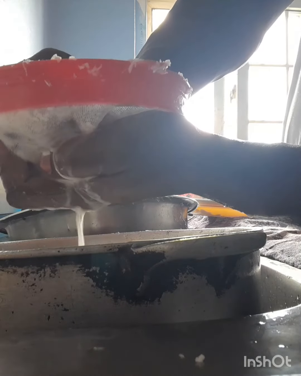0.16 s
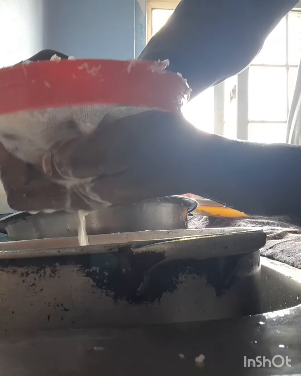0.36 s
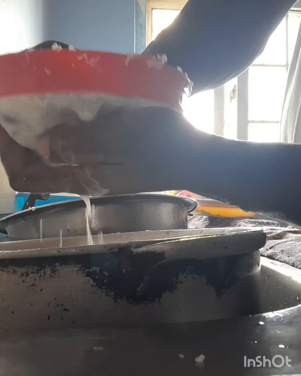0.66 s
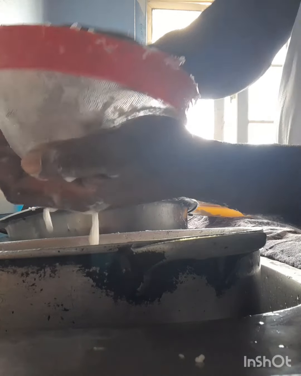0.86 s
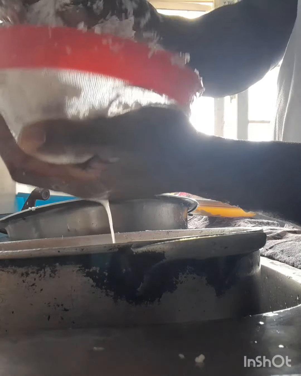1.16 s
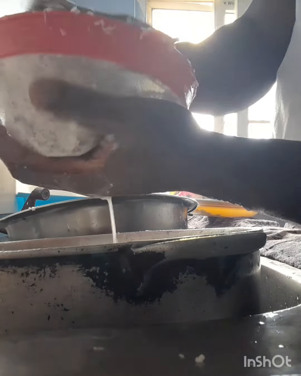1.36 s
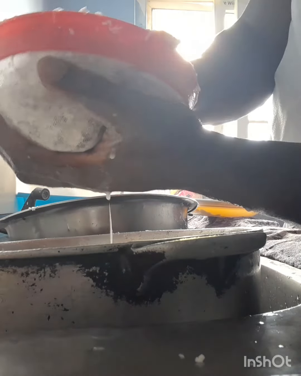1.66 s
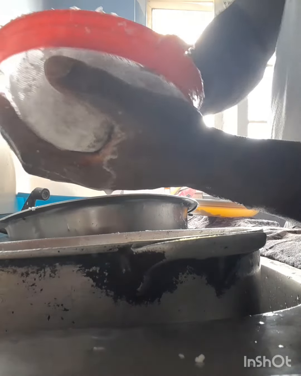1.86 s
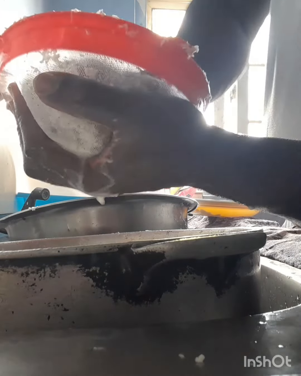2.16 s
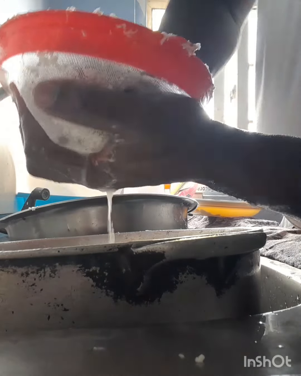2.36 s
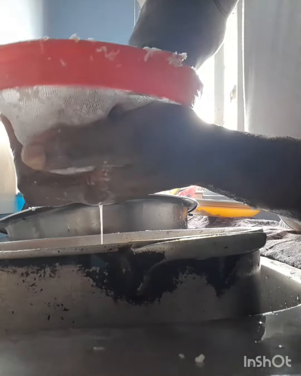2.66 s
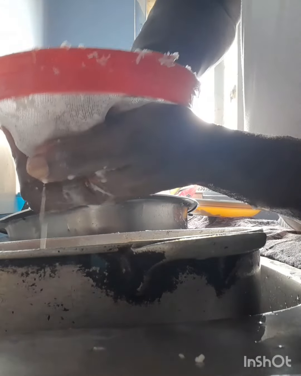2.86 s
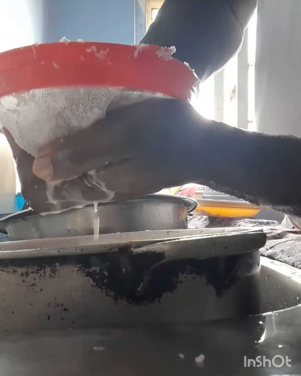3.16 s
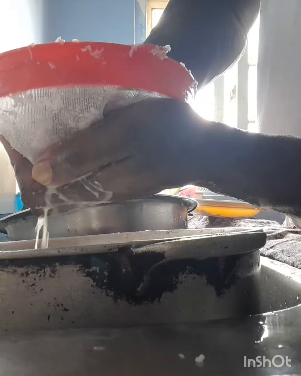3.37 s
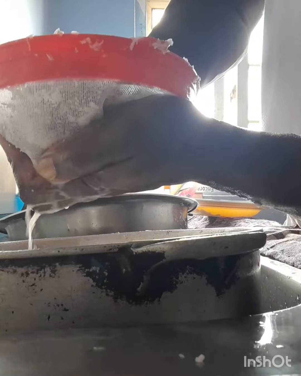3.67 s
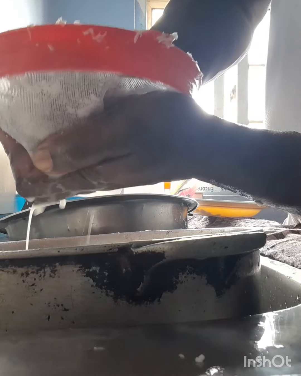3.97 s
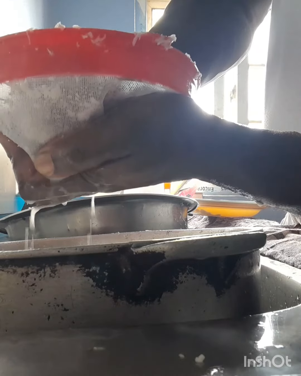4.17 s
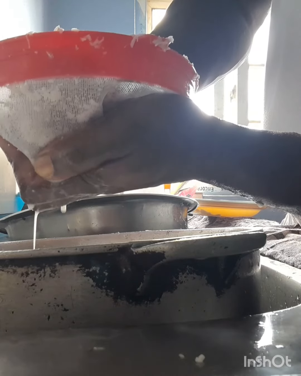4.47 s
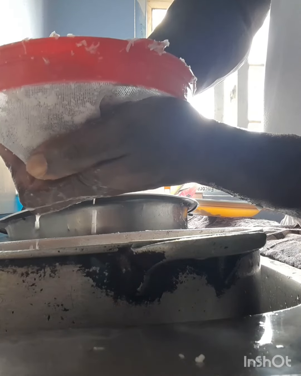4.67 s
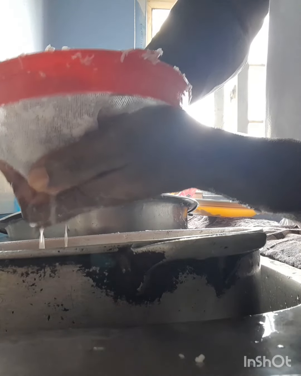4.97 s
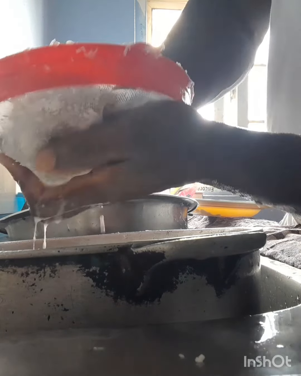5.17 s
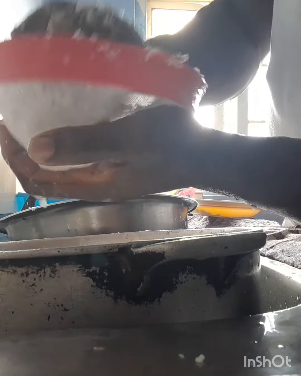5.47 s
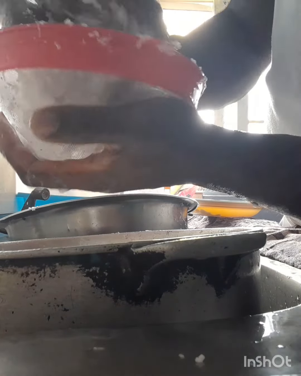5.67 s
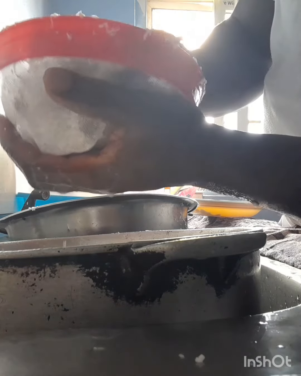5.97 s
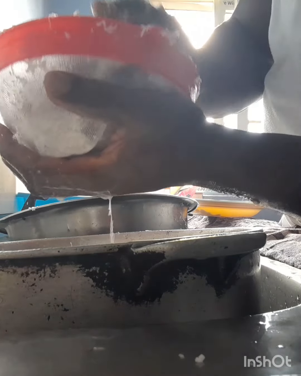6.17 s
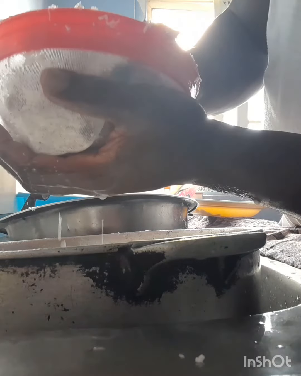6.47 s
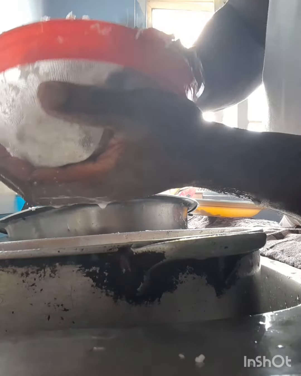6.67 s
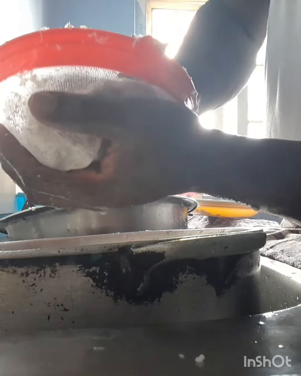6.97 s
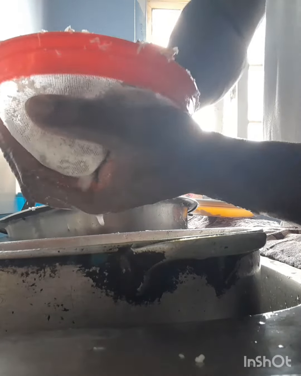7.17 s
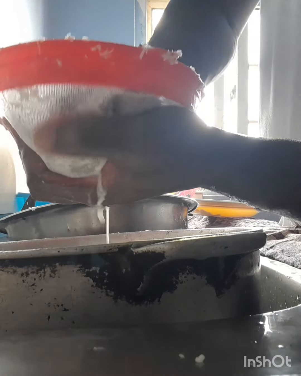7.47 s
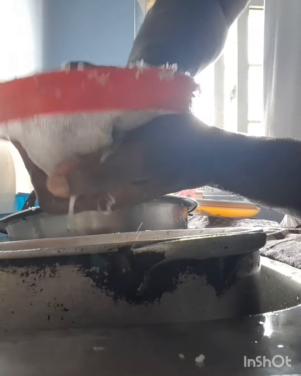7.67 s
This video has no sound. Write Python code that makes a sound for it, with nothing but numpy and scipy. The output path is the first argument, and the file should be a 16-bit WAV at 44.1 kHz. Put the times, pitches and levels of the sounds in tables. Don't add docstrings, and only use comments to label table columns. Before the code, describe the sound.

Uneven airy hissing puffs as hands squeeze wet grated pulp through a strainer, milky drips plinking into a metal pot, late dull bumps.

```python
import sys
import numpy as np
from scipy import signal
from scipy.fft import rfft, irfft, next_fast_len
from scipy.io import wavfile
from scipy.ndimage import uniform_filter1d

SR = 44100
rng = np.random.default_rng(int(sys.argv[2]) if len(sys.argv) > 2 else 0)


def volts_from_decibels(level):
    exponent = np.asarray(level, float) / 20
    return 10 ** exponent


def bounce(signal):
    frames = np.transpose(np.atleast_2d(signal))
    limited = np.clip(frames, -1, 1)
    pcm = np.round(limited * 32767).astype(np.int16)
    wavfile.write(sys.argv[1], SR, pcm)


N = 344862


def evened(x):
    return x / np.sqrt(np.mean(x ** 2) + 1e-20)


def read(points, hz):
    f, value = np.transpose(points)
    return np.interp(np.log(hz + 1), np.log(f + 1), value)


def add(mix, s, sound):
    part = mix[:, round(s * SR):][:, :sound.shape[1]]
    part += sound[:, :part.shape[1]]


def paths(t60, direct_db, lag, size):
    t = np.arange(8192) / SR
    tail = rng.standard_normal((2, 8192)) * volts_from_decibels(-60 * t / t60)
    tail /= np.linalg.norm(tail, axis=1)[:, None]
    tail[0, lag] += volts_from_decibels(direct_db)
    tail[1, 0] += volts_from_decibels(direct_db)
    comb = rfft(tail, size)
    smooth_power = uniform_filter1d(abs(comb) ** 2, size=size // 200, axis=1)
    return comb / np.sqrt(smooth_power)


def puffing(t, leak_db=-12):
    # (peak time [s], strength [dB], length [s], body [dB])
    swelling = [(0.158, 5, 0.079, 0.5), (.482, .5, 0.077, 2), (0.626, -2, 0.1, 0.8), (0.797, 0, 0.087, 1),
                (.94, 2.5, .076, -1), (1.342, -4.5, 0.041, 1), (1.48, -3.5, 0.11, -0.4),
                (1.882, -4.5, .057, 1.5), (2.314, -4.5, 0.063, 2.5), (2.61, 2, 0.12, 2.8),
                (3.001, 6, 0.076, 1.5), (3.111, 3.5, 0.085, -0.3), (4.184, -1.1, 0.08, 1),
                (4.438, 5, 0.062, 0), (4.597, 1.7, 0.058, 0.5), (4.815, -3, 0.06, -1),
                (6.252, 1.2, 0.054, 0), (6.355, 1, .05, 1.5), (7.572, -3, 0.093, 0.5)]
    # (peak time [s], strength [dB], length [s], body [dB])
    sudden = [(0.324, .5, 0.058, 0.7), (1.026, 3.5, 0.097, -1), (1.273, -4, 0.054, 1.5),
              (1.578, 5, 0.056, 0), (1.984, 3.5, 0.071, -0.5), (2.105, 2.5, .07, -0.7),
              (2.458, -1.5, 0.054, 1), (2.702, 1, 0.091, 2), (2.83, 7, 0.075, 0.5), (4.293, -.5, 0.11, 0.5),
              (4.99, -1.5, 0.065, -0.5), (5.09, 0.1, 0.054, 0.5), (5.359, -2, 0.11, 0.8),
              (5.535, 3, .081, -0.5), (5.762, -3.5, 0.036, 4), (5.914, 1.5, 0.11, 1),
              (6.518, 3.5, .099, -1), (6.647, 2, 0.06, 0), (6.874, 3, 0.083, -0.7), (7.08, -6.5, 0.1, 2),
              (7.189, 2.5, 0.088, -1), (7.643, -2, .078, 1.2)]
    # (peak time [s], strength [dB], length [s], body [dB])
    even = [(.004, 4, 0.091, 0.5), (0.237, 3, 0.078, .4), (1.18, -1, 0.061, 0), (1.698, 3, 0.061, 3),
            (1.838, 0.2, 0.091, 1), (2.238, 2.5, 0.063, -1.5), (2.392, -2, 0.054, 1.2),
            (3.258, 3, 0.12, -1), (3.398, -0.8, 0.099, 0.2), (3.512, 2.2, 0.053, .5), (3.611, -1, .074, 1),
            (3.709, -0.4, 0.079, -0.7), (3.826, -3, 0.087, 0.5), (3.925, -3.5, .088, -0.2),
            (4.068, 3.5, 0.072, -1), (4.533, 4, 0.073, 0.5), (4.681, .5, 0.071, -1),
            (4.843, 0.5, 0.032, 0.5), (4.902, -7, 0.074, .9), (5.231, 4.5, .064, 0),
            (5.669, -1, 0.092, -0.5), (5.794, -6, .046, -0.5), (6.077, 5, .075, 0), (6.196, 3, 0.052, 0),
            (6.436, 7.5, 0.06, 0), (6.768, 3.5, 0.068, 0.2), (7.008, -1.5, 0.053, 0),
            (7.325, 4, .078, -0.5), (7.436, 3.5, .066, 1), (7.765, -2, .095, 1.5)]
    # (share of its length spent rising [0-1], fizz [dB])
    puff_kinds = [
        (0.66, 2),
        (0.33, 1.6),
        (0.5, 1.3),
    ]
    rows = [row + kind for table, kind in zip((swelling, sudden, even), puff_kinds) for row in table]
    s, db, length, body_db, rising, fizz_db = np.transpose(rows)
    since_peak = t[:, None] - s
    side = np.where(since_peak < 0, rising, 1 - rising)
    spread = np.maximum(length * side, .005)
    bells = volts_from_decibels(db) ** 2 * np.exp(-(since_peak / spread) ** 2) + 1e-9
    total = bells.sum(1)
    weight = bells / total[:, None]
    strength_db = 10 * np.log10(total + volts_from_decibels(leak_db) ** 2)
    return strength_db, weight @ body_db, weight @ fizz_db


def hiss(size, spit_db=1.0):
    # (frequency [Hz], share [0-1])
    still = [(1000, .6), (7000, .55), (10000, .4), (14000, .25)]
    # (frequency [Hz], level [dB per Hz])
    port_left = [(400, -24), (1100, -18.5), (1850, -17), (2250, -11.5), (3500, -10.5), (5000, -6.5),
                 (5600, -6.5), (6500, -5.5), (7300, -1), (8300, -6.5), (9000, -12), (11300, -14.5),
                 (13000, -11.5), (15300, -11)]
    # (frequency [Hz], level [dB per Hz])
    port_right = [(400, -23), (1200, -22), (1850, -18.5), (2500, -13), (3100, -12), (5000, -4), (5700, -3),
                  (6600, -0.55), (7250, 3.5), (7800, -2), (9200, -18.5), (11500, -10.5), (13500, -12.5),
                  (15300, -6)]
    # (frequency [Hz], width [Hz], level [dB])
    narrow_bands = [(5640, 35, 2), (5800, 34, 3.5), (6200, 70, 5.5), (6490, 28, 11.5), (6830, 22, 11.5),
                    (7120, 47, 6), (7300, 100, 2.5), (7400, 16, -12)]
    hz = np.fft.rfftfreq(size, 1 / SR)
    spit = volts_from_decibels(spit_db * evened(uniform_filter1d(rng.standard_normal(size), 24)))
    jet, left, right = rfft(rng.standard_normal((3, size)) * spit)
    share = np.clip(read(still, hz), 0, 1)
    fixed = np.sqrt(share) * jet * paths(0.25, -7.5, lag=20, size=size)
    shifting = np.sqrt(1 - share) * np.array([left, right])
    heard = (fixed + shifting) * volts_from_decibels(np.array([read(port_left, hz), read(port_right, hz)]))
    heard[1] *= volts_from_decibels(sum(db / (1 + (2 * (hz - f) / width) ** 2) for f, width, db in narrow_bands))
    heard /= np.sqrt(1 + (300.0 / (hz + 1)) ** 4)
    return evened(irfft(heard, size)[:, :N])


def steam(jet_db=-24.5, patchy_db=1.1):
    # (frequency [Hz], share of the puff swing [0-1])
    follow = [(150, 0.65), (600, 0.66), (1500, 0.49), (3000, 0.79), (6500, 0.98), (12000, 0.94)]
    # (frequency [Hz], width [Hz], depth [dB])
    notch_hz, notch_width, notch_db = (2950, 130, -6.0)
    f, t, z = signal.stft(hiss(next_fast_len(N + 8192)), SR, nperseg=256, noverlap=192)
    strength_db, body_db, fizz_db = puffing(t)
    patches = uniform_filter1d(rng.standard_normal(z.shape[1:]), 5, 0)
    patches = evened(uniform_filter1d(patches, 30, 1))
    body = read([(700, 0), (1700, 1), (4000, 1), (5000, 0)], f)[:, None]
    fizz = read([(8000, 0), (9500, 1)], f)[:, None]
    field_db = read(follow, f)[:, None] * strength_db
    field_db += body * body_db + fizz * fizz_db + patchy_db * patches
    drift_hz = 190.0 * evened(uniform_filter1d(rng.standard_normal(len(t)), 90))
    field_db += notch_db * np.exp(-((f[:, None] - notch_hz - drift_hz) / notch_width) ** 2)
    puffed = signal.istft(z * volts_from_decibels(field_db), SR, nperseg=256, noverlap=192)[1]
    return volts_from_decibels(jet_db) * puffed[:, :N]


def drips(pot_db=-9):
    # (time [s], peak [dB], pitch [Hz], left-right [dB])
    plain_drips = [(.0024, -30, 1530, 6.5), (0.049, -31, 1640, 9), (.2056, -33, 1610, 3.5),
                   (3.257, -30, 1870, -2), (3.491, -32, 1600, -6), (3.5259, -41, 1800, 1),
                   (3.554, -33.5, 1710, -2.5), (3.798, -36.5, 1480, -.5), (3.888, -34.5, 1530, -.5),
                   (5.2764, -34, 1760, -2)]
    # (time [s], peak [dB], pitch [Hz], left-right [dB])
    low_drips = [(.114, -42, 869, 10), (.172, -43, 668, 1), (.206, -40, 1200, .5), (.355, -46, 970, 2),
                 (.425, -43.5, 1050, 6), (.557, -38, 1520, 4), (.893, -37, 1940, 2), (1.072, -45, 1310, 4),
                 (1.094, -44, 1350, 4), (1.374, -43, 1103, 6.5), (1.46, -47, 980, 4.5),
                 (2.462, -32, 2600, .1), (7.089, -53, 972, 2)]
    # (time [s], peak [dB], pitch [Hz], left-right [dB])
    quick_drips = [(.018, -35, 1490, -8), (.264, -39, 1230, 4), (.483, -38.5, 1100, 7),
                   (1.062, -33, 1540, 2), (1.084, -27.5, 1780, 5), (2.598, -28, 2030, 11)]
    # (time [s], peak [dB], pitch [Hz], left-right [dB])
    ringing_drips = [(1.196, -25.5, 3254, -20), (2.463, -39, 1700, .1), (3.971, -37, 1544, 9),
                     (3.975, -41, 1755, -7)]
    # (time [s], peak [dB], pitch [Hz], left-right [dB])
    big_drips = [(0.557, -34.5, 979, 8), (2.45, -28, 1690, 1)]
    drip_kinds = [
        (55, 0.0073),
        (58, .0035),
        (45, .024),
        (105, .0014),
        (102, 0.012),
    ]
    t, out = np.arange(4000) / SR, np.zeros((2, N))
    tables = zip((plain_drips, low_drips, quick_drips, ringing_drips, big_drips), drip_kinds)
    for s, db, hz, pan_db, cycles, bend in [row + kind for table, kind in tables for row in table]:
        turns = np.cumsum(hz * (.98 + np.minimum(bend * hz * t, 1) ** 2)) / SR
        fade_db = -60 * (t * hz / cycles) ** 1.34
        onset = 1 - np.exp(-(t / 0.0026) ** 2)
        ring = volts_from_decibels(db + fade_db) * onset * np.sin(2 * np.pi * turns)
        ring *= volts_from_decibels(2.8 * evened(uniform_filter1d(rng.standard_normal(len(t)), 130)))
        add(out, s, ring * volts_from_decibels(np.array([[pan_db / 2], [-pan_db / 2]])))
    size = next_fast_len(N + 8192)
    walls = irfft(rfft(out.mean(0), size) * paths(0.3, -30.0, lag=0, size=size), size)
    return out + volts_from_decibels(pot_db) * walls[:, :N]


def bumps():
    # (time [s], peak [dB], tilt [dB per octave], weight on the deep modes [dB], longest ring [s])
    blows = [(6.81, -33, 7, -9.0, 0.053), (6.818, -41, 13.5, -9.0, .07), (6.873, -26, 2, 1, 0.39),
             (6.903, -33.5, -2, -3, 0.28), (6.928, -48.5, -2.5, 14, 0.28), (6.972, -41, 4, 9, .15),
             (7.006, -33, -4, -10, .09), (7.027, -35, -5, -16, 0.17)]
    # (frequency [Hz], level [dB], t60 [s])
    counter = [(113, -5, 0.25), (128, -0.5, 0.12), (210, -15, 0.064), (377, 1, 0.089), (448, -4.5, 0.28),
               (536, -6, 0.15), (673, -7.5, 0.36), (797, -3, .07), (893, 0.5, 0.055), (957, -6, .1),
               (1110, -13, .07)]
    t, out = np.arange(16000) / SR, np.zeros((2, N))
    hz, db, t60 = np.transpose(counter)[:, :, None]
    phases = rng.random((len(blows), 2, len(counter), 1))
    for (s, blow_db, tilt_db, deep_db, longest), phase in zip(blows, phases):
        mode_db = blow_db - 8.5 + db + deep_db * (hz < 150) + tilt_db * np.log2(hz / 400)
        gain = volts_from_decibels(mode_db - 60 * t / np.minimum(t60, longest))
        start = phase[0] * (hz > 300)
        apart = phase[1] * np.minimum(hz / 2500, 1)
        ring = [(gain * np.sin(2 * np.pi * (hz * t + start + k * apart))).sum(0) for k in range(2)]
        add(out, s, np.array(ring) * (1 - np.exp(-t / 0.0046)))
    return out


def rumble(tones_db=-6.0, split_hz=163):
    # (time [s], level [dB], thrum below the split [dB])
    load = [(0, -60.5, -3), (.3, -63.5, 0), (.65, -59.5, -4.5), (1.0, -63, 9.5), (1.2, -70.5, 2),
            (1.75, -61, -3), (2.15, -66, 2.5), (2.5, -57.5, -3), (3.0, -61, -3), (3.55, -62, -4),
            (3.95, -65.5, -5.5), (4.5, -56.5, -3.5), (4.9, -65.5, 2), (5.35, -60.5, -1.5), (6.15, -65, -2),
            (6.45, -59, -1), (7.2, -62, -6.5), (7.82, -65, 1)]
    # (frequency [Hz], level [dB per Hz])
    colour = [(12, -46), (20, -15.5), (112, -1), (163, 0.5), (236, 10.5), (278, -0.5), (364, -3), (416, 3),
              (612, 2.5), (660, 8), (700, -2), (910, -57), (1540, -120)]
    # (frequency [Hz], width [Hz], level [dB])
    room_tones = [(110, 4, 0), (244, 11, -22.5), (432, 14, -39), (698, 16, -4.5), (994, 20, -12)]
    # (frequency [Hz], left-right likeness [0-1])
    likeness = [(30, 0.5), (60, 0.65), (130, 0.75), (290, 0.95), (640, 1), (1400, .1)]
    hz = np.fft.rfftfreq(N, 1 / SR)
    a, b = rfft(rng.standard_normal((2, N)))
    same = np.clip(read(likeness, hz), -1, 1)
    tones = sum(volts_from_decibels(db + tones_db) ** 2 / (1 + (2 * (hz - f) / width) ** 2) for f, width, db in room_tones)
    low = np.array([a, same * a + np.sqrt(1 - same ** 2) * b])
    low = low * volts_from_decibels(read(colour, hz)) * np.sqrt(1 + tones)
    deep = 1 / (1 + (hz / split_hz) ** 10)
    s, *columns = np.transpose(load)
    db, thrum_db = (np.interp(np.arange(N) / SR, s, c) for c in columns)
    mix = evened(irfft(low * (1 - deep), N)) + evened(irfft(low * deep, N)) * volts_from_decibels(thrum_db)
    lumps = evened(uniform_filter1d(uniform_filter1d(rng.standard_normal(N), size=3500), size=3500))
    return mix * volts_from_decibels(0.87 * lumps + db + np.array([[0.5], [3.0]]))


def scene():
    return steam() + drips() + bumps() + rumble()


def top_cut(x):
    return signal.sosfilt(signal.butter(12, 16000, fs=SR, output="sos"), x)


def record(dry):
    thin = signal.sosfilt(signal.butter(2, 32.0, "high", fs=SR, output="sos"), dry)
    edge = signal.firwin(4095, 15480, window=("kaiser", 9), fs=SR)
    return top_cut(signal.oaconvolve(thin, edge[None], "same"))


dry = scene()
out = record(dry)
bounce(out)
```